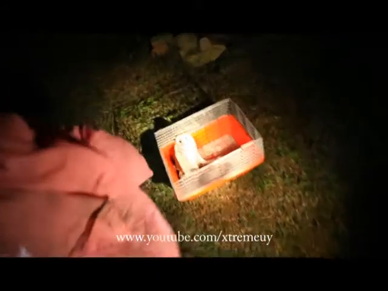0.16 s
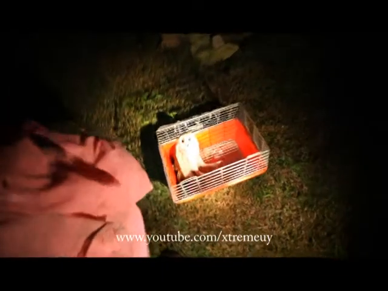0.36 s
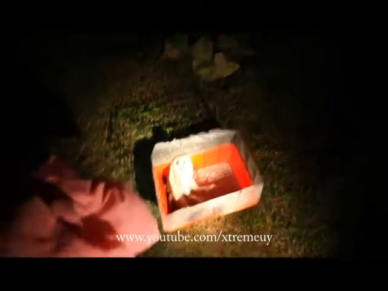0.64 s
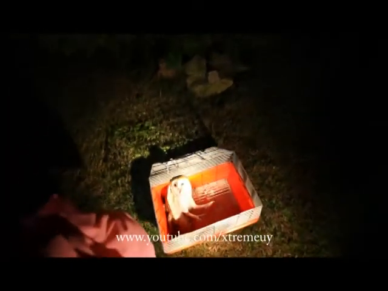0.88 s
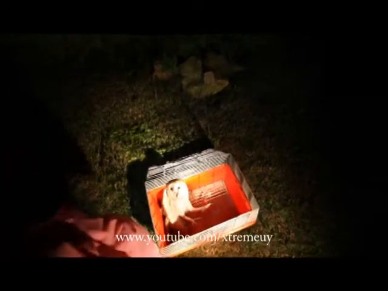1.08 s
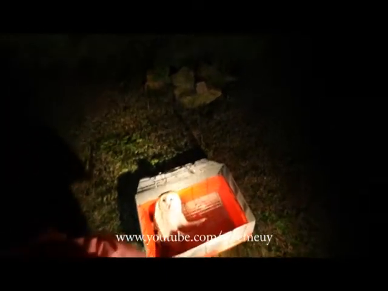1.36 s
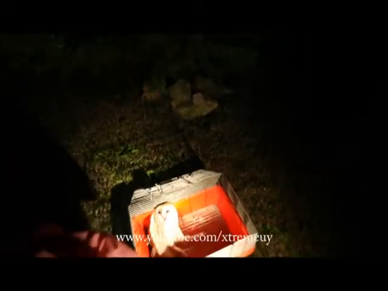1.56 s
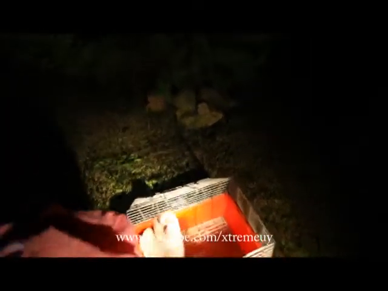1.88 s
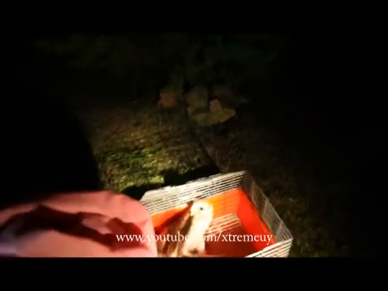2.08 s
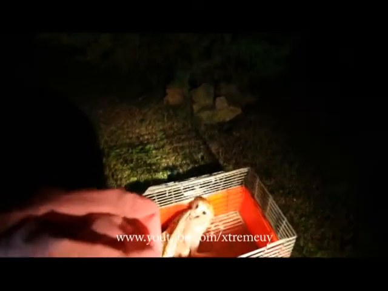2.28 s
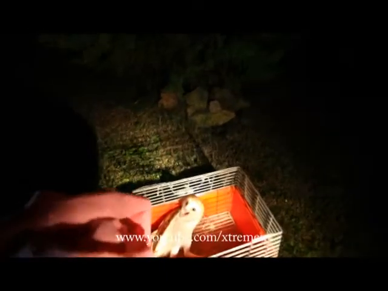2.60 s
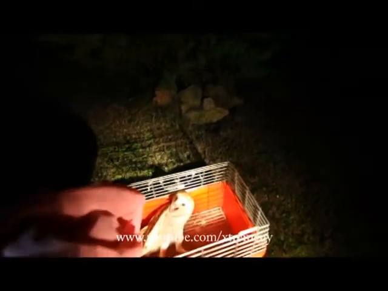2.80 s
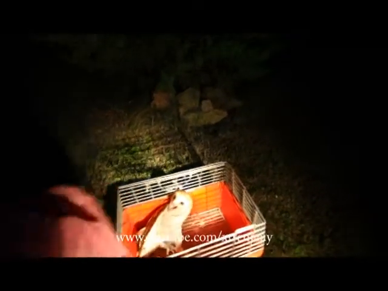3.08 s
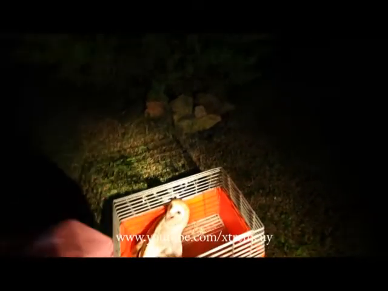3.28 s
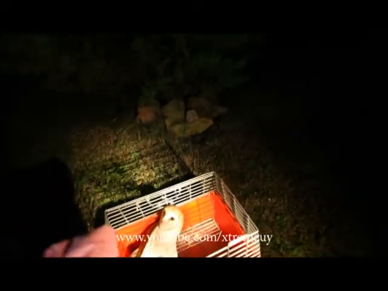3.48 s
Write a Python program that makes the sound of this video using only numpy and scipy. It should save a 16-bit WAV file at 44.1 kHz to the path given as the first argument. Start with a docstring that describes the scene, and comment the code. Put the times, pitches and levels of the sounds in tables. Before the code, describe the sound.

Close by on a quiet lawn at night, a barn owl's loud, rasping screech swells, wavers halfway, resumes and cuts off with a faint echo. Soft microphone bumps and a few dull knocks of a plastic crate lie beneath it.

```python
"""On a lawn at night, a barn owl in a plastic crate starts one long, harsh screech, close by.
Chaotic vibration of its syrinx swells into a two-peaked rasp and chops the breath into a bright hiss.
Midway the bird turns its head: the screech falters, the crate knocks, and the hiss takes another colour.
Near 3.4 s the call stops and a faint echo dies away, leaving the night air and a low hum.
Throughout, soft bumps of handling reach the microphone."""
import sys
import numpy as np
from scipy import signal
from scipy.fft import rfft, irfft
from scipy.io import wavfile
from scipy.ndimage import uniform_filter1d, map_coordinates

SR = 44100
rng = np.random.default_rng(int(sys.argv[2]) if len(sys.argv) > 2 else 0)


def int16_out(signal):
    """Quantize to a 16-bit WAV file."""
    q = np.round(np.clip(np.atleast_2d(signal).T, -1, 1) * 32767)
    wavfile.write(sys.argv[1], SR, q.astype(np.int16))


N = 160965

# Strength of the upper and lower vibrations of the syrinx: time_s, level_db
UPPER_LEVEL = [(0.0, -49), (0.02, -53), (0.14, -28.5), (0.28, -23.5), (0.83, -19), (0.94, -15.5),
               (0.98, -18), (1.33, -18.5), (1.34, -17.5), (1.74, -19.5), (1.79, -15.5), (1.87, -17.5),
               (1.93, -25.5), (1.94, -16.5), (1.97, -27), (2.06, -19), (2.14, -28.5), (2.21, -33),
               (2.22, -40), (2.26, -27.5), (2.27, -29), (2.28, -20), (3.0, -22.5), (3.13, -20.5),
               (3.14, -22), (3.32, -22.5), (3.39, -26)]
LOWER_LEVEL = [(0.0, -45), (0.1, -33.5), (0.24, -21), (0.26, -28.5), (0.31, -19.5), (0.63, -21),
               (0.68, -17.5), (0.83, -23.5), (0.95, -19.5), (1.06, -24), (1.79, -21), (1.89, -45),
               (1.96, -35.5), (2.15, -35), (2.22, -25), (2.31, -32.5), (3.18, -26.5), (3.39, -27.5)]
# Centre frequencies of the two vibrations: time_s, pitch_hz
UPPER_PITCH = [(0.05, 2141), (0.44, 2518), (1.02, 2397), (1.13, 2472), (1.98, 2598), (2.01, 2427),
               (2.21, 2326), (2.64, 2455), (2.79, 2378), (2.82, 2518), (3.02, 2459), (3.05, 2580),
               (3.15, 2400), (3.35, 2506), (3.38, 2440)]
LOWER_PITCH = [(0, 2080), (.06, 2049), (.15, 1878), (.4, 1942), (.95, 1877), (1.35, 1933), (1.75, 1899),
               (1.92, 2140), (2.21, 1982), (2.32, 2155), (2.55, 2039), (3.3, 1994)]
# Part of the upper vibration's power in its narrow, piercing core: time_s, share_fraction
CORE_SHARE = [(0, .15), (.6, .15), (.85, .5), (1.5, .45), (1.8, .25), (2.1, .4), (2.6, .22), (3.4, .18)]
# How firmly the strength of the rasp is held, loose at first: time_s, hold_fraction
PRESSURE_HOLD = [(0, .05), (.6, 0.1), (.95, 0.5), (3.4, 0.66)]
# Response of the throat: frequency_hz, gain_db
THROAT_RESPONSE = [(300, -31), (900, -9), (1300, -7), (1600, -2), (1850, 2.5), (2150, 2), (2500, 3),
                   (2800, 5.5), (3150, -2), (4200, 9.5), (8000, -32), (12000, -59.5)]

# Strength aimed at for the hiss, from 5 to 9 kHz and above 9 kHz: time_s, level_db
HISS_LEVEL = [(0.0, -46), (0.06, -30.5), (0.08, -36), (0.11, -27.5), (0.18, -29), (0.2, -26), (0.25, -32.5),
              (0.82, -31.5), (0.94, -25), (1.1, -28), (1.23, -27), (1.25, -30), (1.37, -26.5), (1.62, -25),
              (1.77, -28), (1.81, -21), (1.86, -19), (1.9, -25), (1.95, -20.5), (1.97, -22), (1.99, -21.5),
              (2.05, -18), (2.08, -33), (2.1, -29.5), (2.18, -35), (2.21, -27), (2.38, -21), (2.84, -22.5),
              (3.03, -26.5), (3.11, -23.5), (3.37, -25), (3.39, -27)]
FIZZ_LEVEL = [(0.0, -57), (0.11, -42.5), (0.33, -33.5), (0.94, -30), (1.08, -33.5), (1.81, -29),
              (1.87, -27.5), (1.9, -35.5), (1.93, -29), (1.98, -39), (2.03, -35.5), (2.19, -56),
              (2.25, -38), (2.27, -42.5), (2.3, -34.5), (2.61, -39), (2.74, -37), (3.0, -39.5),
              (3.34, -37.5), (3.39, -40)]
# Random sputter of the hiss, deepest in the falter: time_s, depth_db
SPUTTER_DEPTH = [(0, 1.0), (.3, 0.25), (1.8, 0.25), (1.95, 1.25), (2.27, 0.7), (2.35, -0.1), (3.4, 0.14)]
# Spectrum of the hiss for each position of the head: frequency_hz, gain_db
OPENING = [(1820, -64), (3100, -20), (3600, -32), (5720, -27.5), (6080, -11), (6550, -11), (7850, -23.5),
           (8570, -10.5), (9420, -27), (11500, -22), (15500, -32)]
FACING = [(1820, -27), (3100, -0.5), (3410, -10.5), (4140, -4.5), (4550, -9.5), (5960, -3.5), (6820, -11),
          (7750, -17), (9110, -2), (10000, -7), (10700, -6.5), (12900, -6), (13700, -11), (14600, -31),
          (15500, -36)]
RAISED = [(1820, -36), (3100, -6), (3920, -6.5), (4340, -7), (5000, -8), (5680, 0), (6330, -5), (6860, 0),
          (7190, -6), (8120, -22.5), (8860, -8.5), (9870, -11.5), (10100, -5.5), (10700, -6), (11300, -13),
          (12400, -8.5), (13500, -21), (14200, -38.5), (15500, -29)]
TURNING = [(1820, -15), (3100, -8), (3670, -18), (4370, -10), (4770, -19.5), (5460, -8), (6330, -8),
           (7150, -1.5), (8690, -8.5), (10100, -7.5), (12600, -22.5), (14300, -22), (15500, -41)]
DUCKED = [(1820, -42), (3100, -7.5), (3430, -16), (3870, -8), (4250, -7), (4800, -13), (5460, -6),
          (6590, -4), (7440, -9.5), (8340, -11), (9870, -28), (10800, -24), (15500, -51)]
ASIDE = [(1820, -40), (3100, -10), (4340, -12.5), (4870, -14.5), (5530, -7), (6680, -4), (7050, -2),
         (7490, -6), (8070, -1), (9230, -14), (10100, -17.5), (10900, -28), (13500, -27), (15500, -40)]
# Positions held by the head: start_s, end_s, spectrum
HEAD_POSES = [(0, 0.137, OPENING), (0.345, 0.788, FACING), (0.908, 1.78, RAISED), (1.843, 2.05, TURNING),
              (2.09, 2.2, DUCKED), (2.29, 3.65, ASIDE)]
# Whistling resonance that climbs as the beak opens and sags in the falter: time_s, centre_hz, lift_db
BEAK_RESONANCE = [(0, 5840, 12), (.08, 6400, 10), (.17, 6900, 9), (.3, 7100, 9.5), (.45, 7040, 7),
                  (.6, 7250, -2), (.8, 7250, -2), (1.75, 7000, 1.5), (1.86, 7000, 4), (1.98, 7900, 3),
                  (2.05, 7100, 3), (2.12, 6700, 4), (2.21, 5870, 6), (2.31, 6800, 4.5), (2.7, 6900, 4),
                  (3, 7010, 0)]
# Notches that slide through the hiss as the head moves: time_s, centre_hz, depth_db
LOW_HOLLOW = [(0, 3300, 5), (.18, 3700, 9), (.4, 3750, 5), (.75, 4250, 7), (1.3, 4300, 7), (1.7, 4700, 7),
              (2.25, 4750, 5), (2.5, 4950, 7), (3.4, 5050, 6)]
MID_HOLLOW = [(0, 5000, 3), (.17, 5400, 14), (.32, 6400, 12), (.55, 6850, 8), (.76, 6900, 10),
              (.92, 7700, 7), (1.3, 8050, 4), (1.75, 7800, 4), (2.1, 7600, 7), (2.6, 7450, 4),
              (3.4, 7450, 6)]
UPPER_HOLLOW = [(0, 9000, 8), (.3, 8700, 7), (.6, 8650, 12), (.85, 8650, 10), (1.05, 8900, 8),
                (1.25, 8400, 5), (1.75, 8350, 3), (2.3, 9000, 1), (2.7, 9200, 4), (3, 9600, 8),
                (3.15, 9350, 8), (3.4, 9300, 8)]
HIGH_HOLLOW = [(0, 10700, 8), (.35, 10200, 9), (.75, 10100, 10), (.99, 9300, 15), (1.28, 10000, 15),
               (1.5, 9850, 14), (1.79, 10200, 14), (1.84, 12800, 8), (2.1, 11800, 4), (2.18, 9900, 12),
               (2.3, 12150, 12), (2.85, 12250, 14), (3.01, 12800, 12), (3.15, 12300, 14), (3.4, 12100, 14)]
# The four notches together: track, half_width_hz
NOTCHES = [(LOW_HOLLOW, 140), (MID_HOLLOW, 240), (UPPER_HOLLOW, 140), (HIGH_HOLLOW, 230)]
# Strength of the low rush of breath: time_s, level_db
RUSH_LEVEL = [(0.0, -46.5), (0.11, -44.5), (0.52, -42), (1.11, -44.5), (1.76, -46), (1.79, -41.5),
              (1.88, -59), (2.0, -53.5), (3.11, -47), (3.39, -51)]
# Spectrum of that rush: frequency_hz, gain_db
RUSH_SPECTRUM = [(100, -19), (350, -12.5), (600, -6), (700, -6.5), (850, -1.5), (1050, 2), (1250, 0.5),
                 (1480, 4), (1600, -4), (2000, -17.5), (4000, -41)]

# Reflections from the crate walls at the start: delay_ms, gain_ratio
WALL_REFLECTIONS = [(1.45, 0.11), (2.15, 0.098), (3.7, 0.095), (6.3, 0.18)]
# Knocks of the crate: start_s, level_db, decay_s
CRATE_KNOCKS = [(1.785, -44.5, 0.027), (1.9, -50, 0.027), (1.987, -44, 0.021), (2.97, -48, .012)]
# Bumps on the microphone: centre_s, envelope_db, pitch_hz
HANDLING_BUMPS = [(.213, -38, 70), (.24, -37, 55), (.267, -41, 60), (.345, -39, 95), (.755, -37.5, 75),
                  (.858, -30.5, 110), (.878, -34, 65), (1.25, -43, 70), (1.335, -46.5, 84.95),
                  (1.775, -39.5, 100), (1.805, -43, 60), (1.994, -49, 75), (2.977, -46, 268.8),
                  (3.44, -48, 40)]
# Course of the handling rumble: time_s, relative_level_db
RUMBLE_CONTOUR = [(0.0, -58), (0.77, -53.5), (0.94, -59), (1.15, -63.5), (1.63, -58), (2.14, -71.5),
                  (3.25, -65.5), (3.65, -66)]
# Spectra of the rumble and of the night air: frequency_hz, gain_db
RUMBLE_SPECTRUM = [(15, -6), (40, -6), (70, -0.5), (100, 3.5), (130, -7.5), (170, -6.5), (400, -31),
                   (1500, -74)]
NIGHT_SPECTRUM = [(24, -36), (40, -22), (54, -27), (103, -8.5), (216, -16), (284, -5), (313, -14.5),
                  (422, -9), (2990, -15.5), (5850, -12), (7490, -16.5), (12000, -37), (15000, -42)]
# Tones of the faint hum: pitch_hz, level_db
HUM_TONES = [(72, -67.5), (96, -75), (190, -68)]

UPPER_WIDTH_HZ, CORE_WIDTH_HZ, LOWER_WIDTH_HZ = 480, 120, 233
FULL_EFFORT_DB, CHAOS_POWER = -23, 0.35
SATURATION, KNEE = 0.67, 0.49
FLUTTER_DEPTH, PULSE_DEPTH, DOUBLE_PULSE_DEPTH = 0.11, 0.25, 0.33
FLUTTER_HZ, SPUTTER_HZ = 604, 80
BEAK_HALF_WIDTH_HZ, RIPPLE_DB = 320, 1.56
TIME_S = np.arange(N) / SR


def owl(stop_s=3.405, release_s=0.017):
    """Source and filter: the throat shapes the vibration into a rasp; rush and hiss stop with it."""
    swing, level = syrinx()
    rasp = amp(0.08) * level * steady_pressure(tint(swing.real, THROAT_RESPONSE))
    rush = amp(curve(RUSH_LEVEL)) * crate_reflections(tint(rng.standard_normal(N), RUSH_SPECTRUM))
    release = np.clip((stop_s - TIME_S) / release_s, 0, 1)
    return (rasp + rush + amp(-0.06) * hiss(swing)) * release


def syrinx():
    """Saturation: two unsteady vibrations share one compressed swing, even in strength, chaotic in pitch."""
    upper_level, lower_level = amp(curve(UPPER_LEVEL)), amp(curve(LOWER_LEVEL))
    level = np.hypot(upper_level, lower_level)
    # A weak vibration is purer: below full effort its chaos slows down.
    pace = np.minimum(level / amp(FULL_EFFORT_DB), 1) ** CHAOS_POWER
    share = curve(CORE_SHARE)
    broad = np.sqrt(1 - share) * wobble(UPPER_WIDTH_HZ, pace)
    core = np.sqrt(share) * wobble(CORE_WIDTH_HZ)
    upper = upper_level * (broad + core) * phasor(curve(UPPER_PITCH))
    lower = lower_level * wobble(LOWER_WIDTH_HZ, pace) * phasor(curve(LOWER_PITCH))
    swing = (upper + lower) / level
    return unit(swing / (abs(swing) ** 2 + KNEE ** 2) ** (SATURATION / 2)), level


def steady_pressure(rasp):
    """Compression: steady air pressure evens out slow swells of the vibration."""
    power = uniform_filter1d(unit(rasp) ** 2, size=500)
    return unit(rasp / (power + 1e-3) ** (curve(PRESSURE_HOLD) / 2))


def hiss(swing):
    """Amplitude modulation: the vibration chops the noise of the breath once and twice per cycle."""
    phase = np.angle(swing)
    flutter = FLUTTER_DEPTH * unit(wobble(2 * FLUTTER_HZ).real)
    gate = np.exp(flutter + PULSE_DEPTH * np.cos(phase) + DOUBLE_PULSE_DEPTH * np.cos(2 * phase))
    sputter = amp(curve(SPUTTER_DEPTH) * unit(wobble(2 * SPUTTER_HZ).real))
    air = crate_reflections(gate * sputter * rng.standard_normal(N))
    hz, t, spectra = signal.stft(air, SR, nperseg=512, noverlap=384)
    gain = balance_treble(beak_and_head(hz, t), hz, t)
    return amp(curve(HISS_LEVEL)) * signal.istft(spectra * gain, SR, nperseg=512, noverlap=384)[1][:N]


def beak_and_head(hz, t):
    """Resonance and directivity: peaks and notches glide as the beak opens and the head turns."""
    pose_times = np.ravel([pose[:2] for pose in HEAD_POSES])
    pose_db = np.repeat([spectrum_db(pose[2], hz) for pose in HEAD_POSES], 2, axis=0)
    db = np.array([np.interp(t, pose_times, row) for row in pose_db.T])
    db += moving_band(BEAK_RESONANCE, BEAK_HALF_WIDTH_HZ, hz, t)
    db -= sum(moving_band(track, half_width_hz, hz, t) for track, half_width_hz in NOTCHES)
    ripple = uniform_filter1d(rng.standard_normal(db.shape), size=3, axis=0)
    db += RIPPLE_DB * unit(uniform_filter1d(ripple, size=70, axis=1))
    return amp(db) / np.sqrt(1 + (2400 / (hz[:, None] + 1)) ** 12)  # high-pass at 2400 Hz


def balance_treble(gain, hz, t):
    """Shelving: the middle band is normalised and the fizz above it follows its own level."""
    middle, top = (hz > 5000) & (hz < 9000), hz >= 9000
    middle_gain, top_gain = (np.sqrt((gain[band] ** 2).sum(0) / len(hz)) for band in (middle, top))
    tilt = amp(curve(FIZZ_LEVEL, t) - curve(HISS_LEVEL, t)) * middle_gain / top_gain
    shelf = np.clip((hz[:, None] - 8300) / 1400, 0, 1)
    return gain / middle_gain * tilt ** shelf


def crate_reflections(direct, drift_per_s=0.059):
    """Comb filtering: wall reflections interfere, their paths shortening as the crate is approached."""
    shrink = np.exp(-drift_per_s * TIME_S)
    reflected = sum(gain * map_coordinates(direct, [np.arange(N) - delay_ms * shrink * SR / 1000], order=3)
                    for delay_ms, gain in WALL_REFLECTIONS)
    return unit(direct + reflected)


def crate_knocks():
    """Damping: each dull knock of the plastic decays exponentially."""
    body = tint(rng.standard_normal(N), [(60, -1), (270, 2.5), (700, -5.5), (1500, -16), (5000, -25)])
    return body * sum(amp(db) * (TIME_S > start_s) * np.exp(-abs(TIME_S - start_s) / decay_s)
                      for start_s, db, decay_s in CRATE_KNOCKS)


def garden_echo(call, level_db=-31, t60_s=0.72):
    """Reverberation: the surroundings return a faint, diffuse tail of the call."""
    t = np.arange(SR) / SR
    tail = tint(rng.standard_normal(SR),
                [(500, 0), (1200, 0), (2300, -12), (4000, -2), (7000, -2), (11000, -12)])
    tail *= amp(-60 * t / t60_s)
    return amp(level_db) * signal.fftconvolve(call, tail / np.linalg.norm(tail))[:N]


def handling():
    """Structure-borne sound: the hand passes rumble and soft bumps into the microphone."""
    sound = amp(curve(RUMBLE_CONTOUR) + 2.5) * tint(rng.standard_normal(N), RUMBLE_SPECTRUM)
    half_width_s = 0.0066
    for centre_s, db, hz in HANDLING_BUMPS:
        t = TIME_S - centre_s
        sound += amp(db) * np.exp(-(t / half_width_s) ** 2) * np.sin(2 * np.pi * hz * t)
    return sound


def night_air(air_db=-55.5):
    """Ambient noise: quiet broadband air lies under a hum that wavers by slow random modulation."""
    hum = sum(amp(db) * unit(((1 + 0.5 * wobble(5.8)) * phasor(hz)).real) for hz, db in HUM_TONES)
    return hum + amp(air_db) * tint(rng.standard_normal(N), NIGHT_SPECTRUM)


def amp(db):
    """Decibels as an amplitude ratio."""
    return 10 ** (np.asarray(db) / 20)


def unit(x):
    """Normalisation to rms 1."""
    return x / np.sqrt(np.mean(abs(x) ** 2) + 1e-20)


def curve(rows, t=TIME_S, column=1):
    """Linear interpolation of one column of a time table."""
    rows = np.array(rows, float)
    return np.interp(t, rows[:, 0], rows[:, column])


def spectrum_db(points, hz):
    """Interpolation of a spectrum on a log-frequency axis."""
    point_hz, db = np.transpose(points)
    return np.interp(np.log(hz + 1), np.log(point_hz + 1), db)


def tint(x, points):
    """Filtering by a spectrum of (frequency_hz, gain_db) points; rms 1."""
    hz = np.fft.rfftfreq(len(x), 1 / SR)
    return unit(irfft(rfft(x) * amp(spectrum_db(points, hz)), len(x)))


def moving_band(track, half_width_hz, hz, t):
    """A Gaussian band with a gliding centre, in dB over frequency and time."""
    return curve(track, t, column=2) * np.exp(-((hz[:, None] - curve(track, t)) / half_width_hz) ** 2)


def wobble(width_hz, pace=1):
    """Narrow-band complex noise around zero frequency; a pace under 1 narrows the band."""
    b, a = signal.butter(2, width_hz / SR)
    real, imaginary = rng.standard_normal((2, N + SR))
    noise = signal.lfilter(b, a, real + 1j * imaginary)[SR:]
    return unit(np.interp(np.cumsum(pace * np.ones(N)), np.arange(N), noise))


def phasor(hz):
    """A rotation whose phase is the integral of frequency."""
    return np.exp(2j * np.pi * np.cumsum(hz * np.ones(N)) / SR)


def scene():
    """Superposition: all sources add at one microphone, alike in both channels."""
    call = owl()
    mono = call + garden_echo(call) + handling() + crate_knocks() + night_air()
    return np.array([mono, mono])


def record(dry, cutoff_hz=15720):
    """Band limiting: a steep low-pass filter removes the highest treble."""
    lowpass = signal.firwin(511, cutoff_hz, window=("kaiser", 9), fs=SR)
    return signal.oaconvolve(dry, lowpass[None], "same")


dry = scene()
out = record(dry)
int16_out(out)
```